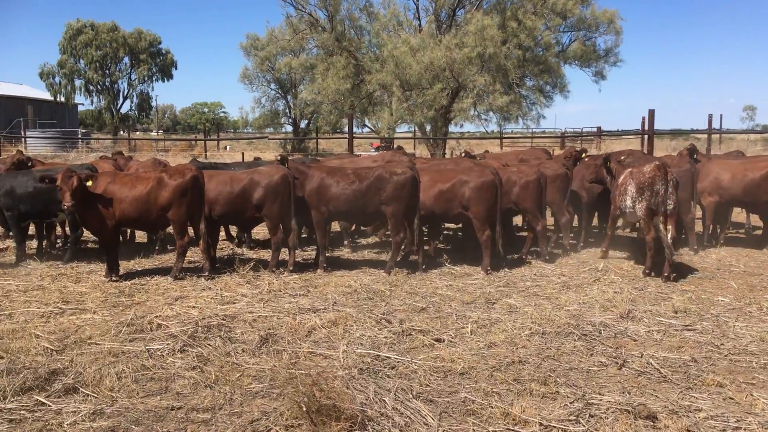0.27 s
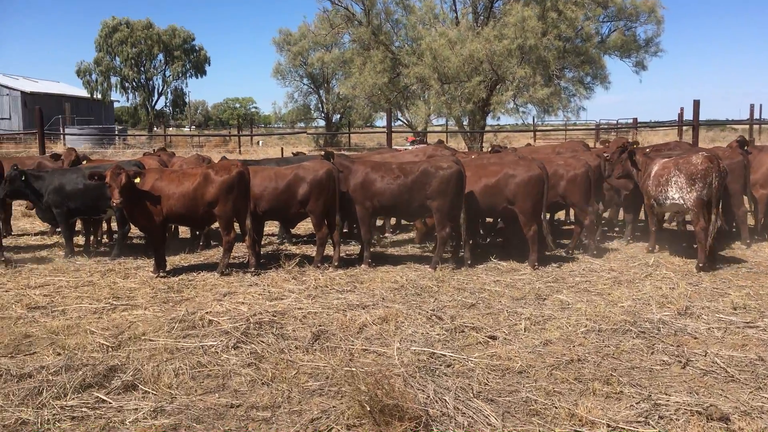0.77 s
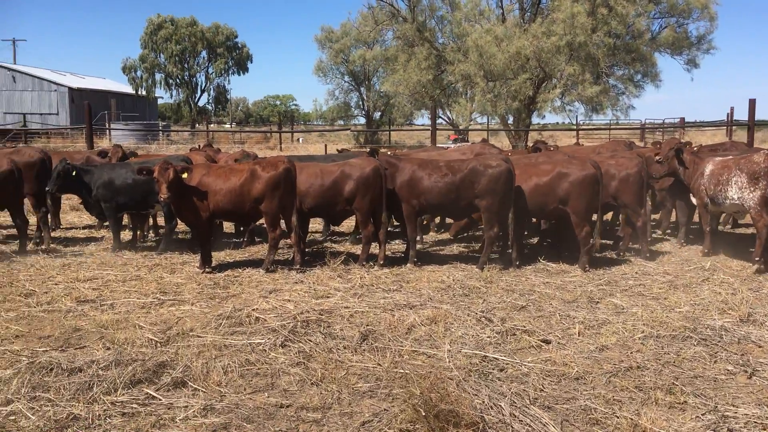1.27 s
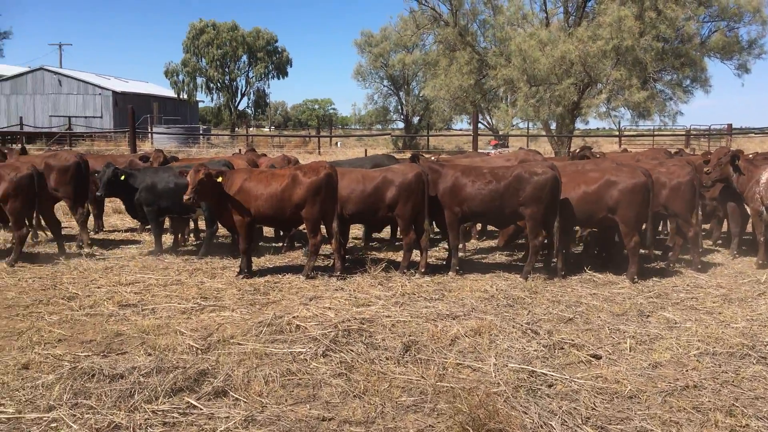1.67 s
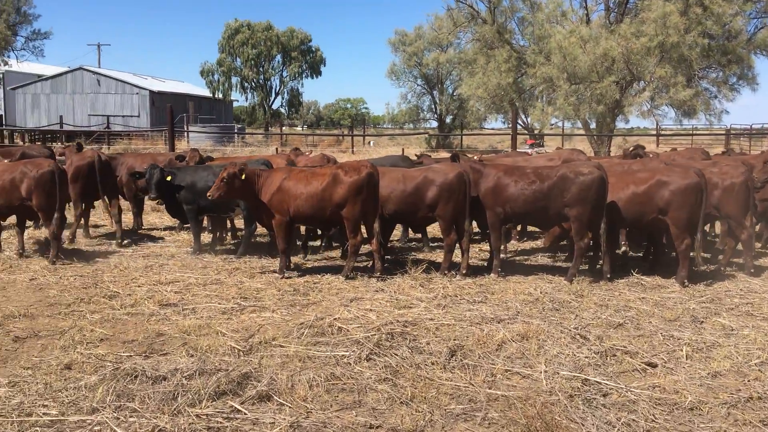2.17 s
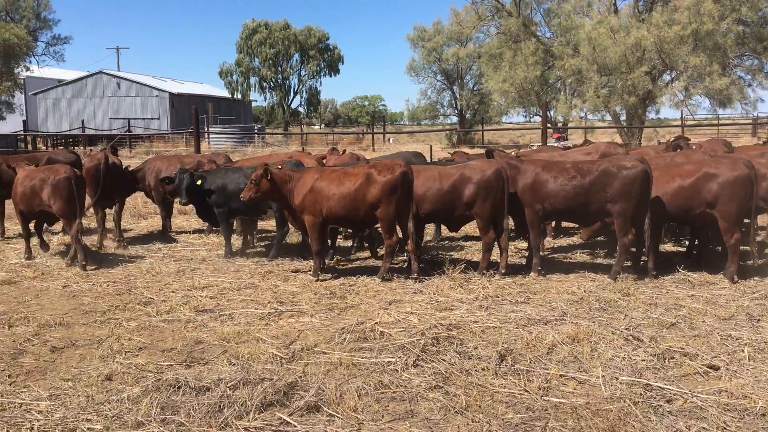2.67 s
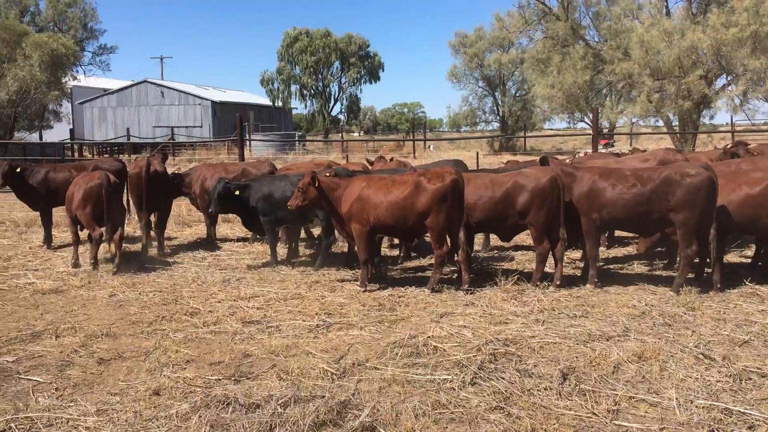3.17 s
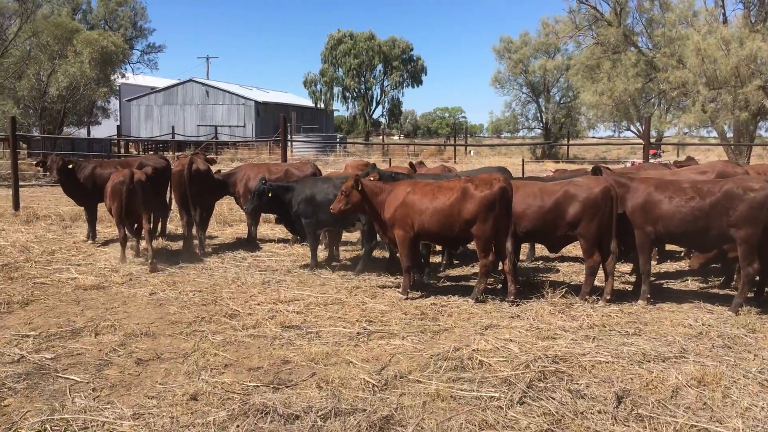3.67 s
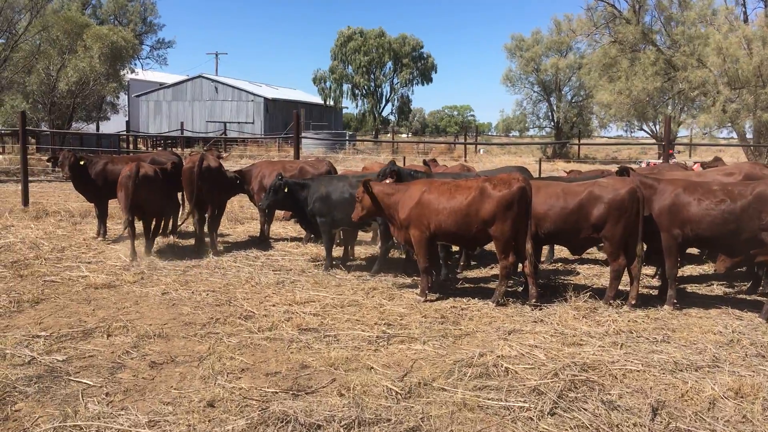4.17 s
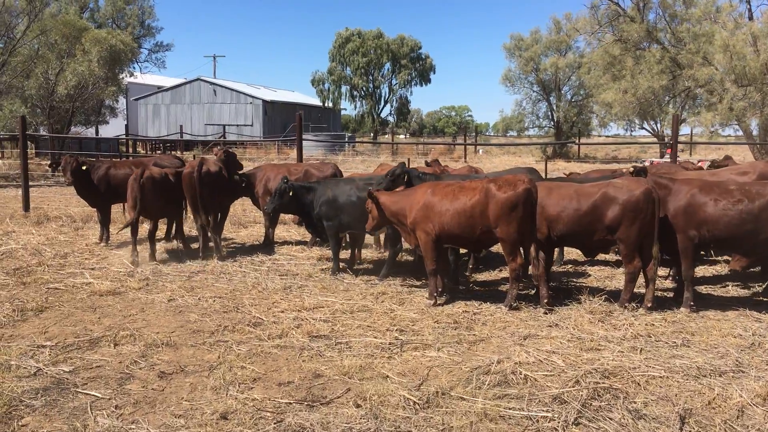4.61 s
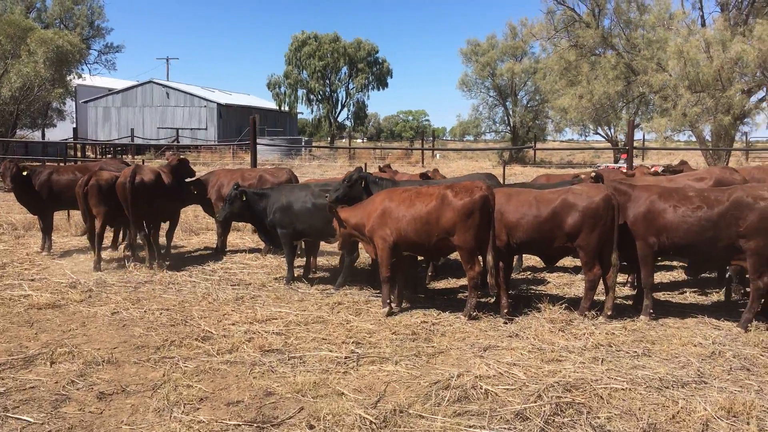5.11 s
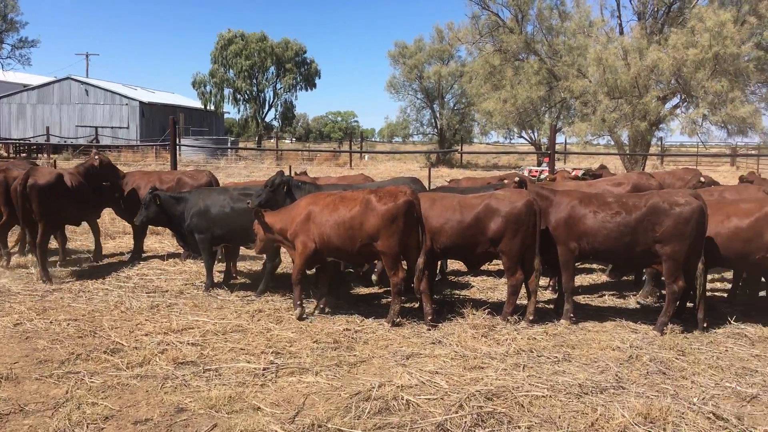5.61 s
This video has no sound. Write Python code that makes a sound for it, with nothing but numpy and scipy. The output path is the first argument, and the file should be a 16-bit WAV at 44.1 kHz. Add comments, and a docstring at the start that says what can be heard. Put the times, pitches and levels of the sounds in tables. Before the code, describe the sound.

Dry straw swishes and snaps under unhurried steps, dull earth knocks beneath, while soft outdoor hiss and low wind puffs continue.

```python
"""An open cattle yard: slow steps on dry straw and stubble, heard by one microphone.
Each step swells a swish of tiny stalk fractures and a darker crunch, both made of short rings and noise.
Single stalks snap, clods knock and the earth thuds: noise bursts through clicks tuned to each break.
Light wind rumbles on the microphone as low noise, over the steady filtered hiss of the yard."""
import sys
import numpy as np
from scipy import signal
from scipy.fft import rfft, irfft, next_fast_len
from scipy.io import wavfile
from scipy.ndimage import map_coordinates

SR = 44100
rng = np.random.default_rng(int(sys.argv[2]) if len(sys.argv) > 2 else 0)


def inscribe(sig):
    """Save sig as 16-bit PCM at rate SR to the path in sys.argv[1].

    A 1-D sig is mono; a 2-D sig holds one channel per row.
    Samples are clipped to [-1, 1] before scaling.
    """
    pcm = np.round(np.clip(np.atleast_2d(sig).T, -1, 1) * 32767)
    wavfile.write(sys.argv[1], SR, pcm.astype(np.int16))


N = 257974  # length in samples

# A foot pressing or brushing through the litter. Each row: greatest pressure in seconds, rise in seconds,
# fall in seconds, relative swish of fine straw in dB, relative crunch of coarse stubble in dB.
FOOTSTEPS = [(0.234, 0.18, 0.18, -39.5, -71), (0.426, 0.038, 0.17, -44, -66),
             (0.719, 0.056, .025, -38.5, -64), (0.837, .04, .14, -48, -72), (1.129, .13, 0.027, -42, -56.5),
             (1.229, 0.088, 0.039, -41, -79), (1.378, 0.078, .03, -45, -63), (1.54, 0.055, 0.065, -49, -60),
             (1.657, 0.0319, 0.13, -48, -61), (1.805, 0.031, 0.051, -48, -72), (2.08, 0.12, .17, -47, -56),
             (2.224, 0.17, .09, -44, -67), (2.484, 0.12, .04, -47, -56.5), (2.598, .15, 0.035, -45.5, -65),
             (2.702, 0.088, 0.032, -45, -61), (2.79, 0.042, .08, -48.5, -55.5),
             (2.86, .08, .13, -47.5, -62), (3.262, 0.14, 0.14, -41.5, -54.5),
             (3.531, 0.033, 0.044, -49, -60), (3.685, 0.019, .05, -56, -61.5), (4.073, .14, .1, -41.5, -57),
             (4.349, .1, 0.17, -52, -64), (4.543, 0.029, 0.039, -50, -56.5),
             (4.717, .04, .13, -51.5, -63.5), (4.919, .075, .045, -42, -56.5), (5.11, 0.021, .15, -53, -66),
             (5.3, .045, 0.088, -42.5, -74.5), (5.448, 0.031, 0.074, -46.5, -56.5),
             (5.835, 0.21, 0.072, -46.5, -76)]


def amp(db):
    """Decibels to gain."""
    return 10 ** (np.asarray(db) / 20)


def unit(x):
    """Scale to rms 1."""
    return x / np.sqrt(np.mean(x ** 2) + 1e-20)


def curves(rows):
    """One value per sample for each column after the time, in straight lines between rows."""
    s, *cols = np.transpose(rows)
    return [np.interp(np.arange(N) / SR, s, c) for c in cols]


def wobble(rate):
    """A smooth random curve, rate knots a second."""
    knots = rng.standard_normal(int(N * rate / SR) + 4)
    return map_coordinates(knots, [np.arange(N) * rate / SR])


def filtered(x, response):
    """x times a response of frequency."""
    m = next_fast_len(N + 8192)
    spectrum = rfft(x, m) * response(np.fft.rfftfreq(m, 1 / SR))
    return irfft(spectrum, m)[..., :N]


def coloured(x, spectrum):
    """x through (Hz, dB) points on a log axis, at rms 1."""
    f, db = np.transpose(spectrum)
    return unit(filtered(x, lambda hz: amp(np.interp(np.log(hz + 1), np.log(f), db))))


def swell(s, rise_s, fall_s, swing_db):
    """A gain that climbs evenly in dB to 1 at time s, then sinks; it moves swing_db per rise or fall time."""
    t = np.arange(N) / SR - s
    return amp(-swing_db * np.maximum(-t / rise_s, t / fall_s))


def pulse(centre_hz, octaves, steepness, size=2048):
    """A causal click of peak 1 whose energy lies in a bell around its centre; low steepness gives wide skirts."""
    away = np.log2((np.fft.rfftfreq(size, 1 / SR) + 1) / centre_hz) / octaves
    log_gain = -steepness * np.log(1 + away ** 2 / (4 * steepness))
    cepstrum = irfft(log_gain)
    # doubling the first half of the cepstrum packs the energy at the onset (minimum phase)
    click = irfft(np.exp(rfft(2 * cepstrum[:size // 2], size)))
    return click / np.abs(signal.hilbert(click)).max()


def add(track, s, sound):
    """Mix a sound into a track at a time."""
    part = track[max(round(s * SR), 0):][:len(sound)]
    part += sound[:len(part)]


def fracture(click, tear_t60, splinter_db, splinter_t60):
    """One sharp break that tears on, then a spray of splinters of the same colour; each t60 is s to fall 60 dB."""
    t = np.arange(SR // 8) / SR
    tear, spray = rng.standard_normal((2, len(t)))
    tear *= amp(-60 * t / tear_t60)
    force = .5 * tear / np.linalg.norm(tear)
    force[0] = 1  # the break itself
    crack = signal.fftconvolve(force, click)
    splinters = signal.fftconvolve(spray * amp(-60 * t / splinter_t60), click)
    # the break carries the energy of the plain click, the splinters a share of it
    crack /= np.linalg.norm(crack)
    splinters *= amp(splinter_db) / np.linalg.norm(splinters)
    return np.linalg.norm(click) * (crack + splinters)


def crackle(rate, spread_db, low_hz, high_hz, life, size=160):
    """Tiny breaks at random moments, rate a second: each rings at its own pitch and fades over life seconds."""
    start = np.flatnonzero(rng.random(N) < rate / SR)
    pitch, chance, phase = rng.random((len(start), 3)).T[:, :, None]
    t = np.arange(size) / SR
    strength = amp(-spread_db * np.log(chance + .015))  # a positive spread leaves a few breaks much stronger
    hz = low_hz + pitch * (high_hz - low_hz)
    rings = strength * np.exp(-t / life) * np.sin(2 * np.pi * (hz * t + phase))
    samples = start[:, None] + np.arange(size)
    return unit(np.bincount(samples.ravel(), rings.ravel(), N + size)[:N])


def slips(rate, life, depth_db):
    """A gain that jumps whenever a bunch of stalks gives way, rate a second, and sinks again over life seconds."""
    jumps = (rng.random(N) < rate / SR) * rng.random(N)
    surge = signal.lfilter([1], [1, -np.exp(-1 / (life * SR))], jumps)
    return unit(amp(depth_db * unit(surge - surge.mean())))


def wind():
    """Relative strength of the wind as a gain: short puffs that come and go over a wandering breeze."""
    # The light air between puffs. Each row: time in seconds, relative level in dB.
    breeze = [(0, -67.5), (2.5, -63), (3.0, -72), (3.7, -66), (4.5, -64), (5.5, -69), (5.85, -63)]
    # Puffs on the microphone. Each row: peak in seconds, relative level in dB, time to rise or sink in seconds.
    puffs = [(0.141, -55.5, 0.22), (0.602, -53.5, 0.17), (0.746, -45, 0.024), (0.97, -52, .07),
             (1.12, -54, 0.037), (1.393, -57, 0.11), (1.689, -56, 0.077), (1.823, -50, 0.056),
             (2.571, -51, .06), (2.66, -52.5, 0.091), (3.22, -54, 0.062), (4.129, -54, 0.059),
             (4.364, -55, 0.19), (5.147, -52.5, 0.071)]
    swing_db, eddies_per_s = 3, 12
    power = amp(curves(breeze)[0] + swing_db * wobble(eddies_per_s)) ** 2
    for s, db, length_s in puffs:
        power += (amp(db) * swell(s, length_s, length_s, swing_db=18.5)) ** 2
    return np.sqrt(power)


def air():
    """The steady hush of the open yard, and low eddies on the microphone: two noises of different colour."""
    # Level of the hush. Each row: time in seconds, level in dB.
    hush_level = [(0, -59), (2.3, -57), (3.0, -59), (4.2, -57.5), (5.85, -59.5)]
    # Colour of the hush. Each row: frequency in Hz, relative density in dB.
    yard_colour = [(30, -47), (70, -2), (160, -2), (260, -6.5), (450, -15.5), (750, -16), (1100, -15),
                   (2000, -18.5), (5000, -21.5), (15000, -15)]
    # Colour of wind on the microphone. Each row: frequency in Hz, relative density in dB.
    buffet_colour = [(15, -15.5), (28, -10), (48, -2), (70, -3.5), (120, -15), (250, -27), (700, -58)]
    hush_gain = amp(curves(hush_level)[0] + 1.47 * wobble(14))
    hush = hush_gain * coloured(rng.standard_normal(N), yard_colour)
    eddies = amp(-2) * wind() * coloured(rng.standard_normal(N), buffet_colour)
    return hush + eddies


def tread():
    """Swish and crunch in dB: every step loads the litter and lets it go, on top of its steady stirring."""
    # Litter that keeps stirring between steps. Each row: time in seconds, relative swish in dB,
    # relative crunch in dB.
    stirring = [(0, -53.5, -56.5), (1.55, -50, -65), (1.92, -53.5, -73.5), (2.3, -51, -62),
                (3.0, -55.5, -69), (3.7, -56, -69), (4.65, -60, -71), (5.85, -59, -66.5)]
    swing_db = 10  # gained over the rise, lost over the fall
    uneven_db, uneven_per_s = 0.35, 25  # the litter is never evenly thick
    power = amp(curves(stirring)) ** 2
    for s, rise_s, fall_s, swish_db, crunch_db in FOOTSTEPS:
        press = amp([[swish_db], [crunch_db]]) * swell(s, rise_s, fall_s, swing_db)
        power += press ** 2
    return 10 * np.log10(power) + uneven_db * wobble(uneven_per_s)


def straw(swish_db):
    """Fine stalks rub and crack; harder pressure breaks more of them a second."""
    # Colour of fine straw. Each row: frequency in Hz, relative density in dB.
    straw_colour = [(500, -29), (2000, -25.5), (3000, -19.5), (5000, -14), (6000, -6), (8000, -6.5),
                    (8700, -1.5), (9600, -0.3), (10400, -4.5), (11400, 0.5), (14000, 1), (15800, -3)]
    pressure = amp(swish_db - swish_db.max())
    cracks = crackle(rate=1500 + 9000 * pressure, spread_db=2.5, low_hz=2004, high_hz=16300, life=0.0002)
    rubbing = rng.standard_normal(N)
    level = amp(swish_db + 1.5) * slips(rate=130, life=0.009, depth_db=1.1)
    return level * coloured(cracks + rubbing, straw_colour)


def stubble(crunch_db):
    """Coarse stems and dry dirt crumble in darker, sparser grains of nearly even strength, amid dusty noise."""
    # Colour of coarse stubble. Each row: frequency in Hz, relative density in dB.
    stubble_colour = [(120, -3), (300, -1.5), (600, -4.5), (1050, -4), (1900, -4), (3300, 1.5),
                      (5000, -0.5), (7000, 8), (15000, -16)]
    grains = crackle(rate=1100, spread_db=-0.5, low_hz=197, high_hz=6720, life=0.00055)
    dust = amp(3.5) * rng.standard_normal(N)
    level = amp(crunch_db + 4.5) * slips(rate=120, life=0.0076, depth_db=1.77)
    return level * coloured(grains + dust, stubble_colour)


def crumbs(crunch_db, count=70):
    """Small lumps of dry earth are crushed between the larger clods, louder where the stubble crunches."""
    track = np.zeros(N)
    for moment, size, pitch in rng.random((count, 3)):
        at = int(moment * N)
        db = -57.5 + 6 * size + 0.4 * (crunch_db[at] - crunch_db.mean())
        click = pulse(500 * 2 ** pitch, octaves=0.45, steepness=26)
        crumb = fracture(click, tear_t60=0.012, splinter_db=-5.5, splinter_t60=0.12)
        add(track, at / SR, amp(db) * crumb)
    return track


def thuds():
    """Weight lands on the earth: a low push, and the litter settles after it."""
    # Soft footfalls on packed earth. Each row: start in seconds, relative level in dB, centre in Hz.
    footfalls = [(0.077, -43, 240), (0.444, -49.5, 203), (1.344, -50, 148), (1.698, -51, 131.1),
                 (2.1, -50, 170), (2.205, -49, 164.4), (2.303, -52, 270.5), (2.346, -51, 230),
                 (2.417, -44.5, 180.8), (2.481, -47, 200.4), (3.205, -49.5, 182.4), (3.398, -47.5, 283.5),
                 (3.492, -47, 286), (4.115, -51, 131), (4.886, -54, 110.5), (5.106, -49.5, 161.3),
                 (5.201, -48.5, 253), (5.272, -48, 116), (5.374, -48.5, 136.4), (5.588, -49, 148),
                 (5.789, -54, 119)]
    track = np.zeros(N)
    for s, db, hz in footfalls:
        click = pulse(hz, octaves=0.43, steepness=7.4)
        thud = fracture(click, tear_t60=0.0098, splinter_db=-2.5, splinter_t60=0.15)
        add(track, s, amp(db - 1.5) * thud)
    return track


def knocks():
    """Clods give way with a dull knock of a few cycles and crumble; the lower the knock, the longer it tears."""
    # Clods and thick stems giving way. Each row: start in seconds, relative level in dB, centre in Hz,
    # width in octaves.
    clods = [(0.081, -45, 415, 1.4), (0.3955, -41, 860, 0.66), (0.431, -38, 700, 1.8),
             (0.447, -39, 450, 1.23), (0.447, -28, 3420, 0.83), (0.5645, -27, 2300, 1.26),
             (0.7194, -29, 2260, 0.81), (1.0624, -36.5, 1300, 0.68), (1.955, -39, 502, 1.4),
             (2.285, -33, 502, 1.7), (2.4137, -36, 1219, 0.81), (2.4185, -29, 446, 2.4),
             (2.48, -32, 1600, 1.6), (2.482, -32.5, 457, 1), (2.4957, -34, 1000, 1.2),
             (2.929, -43.5, 794, 0.65), (3.15, -44.5, 850, 0.56), (3.2187, -39, 2610, .7),
             (3.358, -43.5, 743, 0.69), (3.401, -41.5, 346, 1.24), (3.494, -42.5, 607, 1.1),
             (3.672, -39.5, 1455, 0.56), (4.184, -45, 893, .9), (4.402, -45.5, 1394, 0.59),
             (4.54, -38.5, 1389, 0.58), (4.7823, -34, 2080, 0.91), (4.807, -41, 1100, 0.69),
             (5.1538, -37.5, 835, 0.84), (5.18, -41.5, 2696, 0.27), (5.43, -45.5, 1710, 0.45)]
    tear_cycles = 15  # time to fall 60 dB, in cycles of the clod's own pitch
    track = np.zeros(N)
    for s, db, hz, octaves in clods:
        click = pulse(hz, octaves, steepness=16)
        knock = fracture(click, tear_t60=tear_cycles / hz, splinter_db=-3.5, splinter_t60=0.093)
        add(track, s, amp(db + 1) * knock)
    return track


def twigs(swish_db, count=6):
    """Every step breaks a few small stalks around it, each with its own colour, louder under a heavy foot."""
    scatter_s = .13  # at most this long before or after a step's greatest pressure
    track = np.zeros(N)
    for step_s, *_ in FOOTSTEPS:
        for moment, size, pitch in rng.random((count, 3)):
            s = np.clip(step_s + scatter_s * (2 * moment - 1), 0, (N - 1) / SR)
            db = -38 + 9 * size + 0.083 * (swish_db[int(s * SR)] - swish_db.mean())
            click = pulse(6000 * 2 ** pitch, octaves=0.44, steepness=4.1)
            twig = fracture(click, tear_t60=0.003, splinter_db=-11, splinter_t60=0.06)
            add(track, s, amp(db) * twig)
    return track


def snaps():
    """Brittle stalks break with a bright tick and a short spray."""
    # Single stalks breaking. Each row: start in seconds, relative level in dB, centre in Hz, width in octaves.
    stalks = [(0.14, -24, 10200, 0.65), (0.2283, -11, 10900, 0.7), (0.2304, -14.5, 9000, .55),
              (0.4216, -21.5, 9000, 0.32), (0.565, -32, 6100, 0.44), (0.651, -25, 11300, .23),
              (0.7046, -19, 12400, 0.22), (0.717, -22, 12000, .37), (0.7194, -9, 10490, 0.29),
              (0.7761, -30, 12100, 0.36), (0.954, -19, 12200, 0.33), (1.0621, -10.5, 13000, 0.46),
              (1.6657, -24.5, 10700, 0.36), (2.4142, -21.5, 7800, 0.43), (2.481, -25.5, 8500, 0.31),
              (2.8908, -24.5, 11340, 0.24), (3.5297, -22, 10340, 0.3), (3.72, -27.5, 8450, 0.72),
              (4.0176, -16.5, 9680, 0.3), (4.0763, -28, 13140, 0.51), (4.1836, -30, 10150, 0.51),
              (4.3965, -24.5, 10300, 0.33), (4.414, -22, 9700, 0.49), (4.4437, -33, 8100, .54),
              (4.46, -27.5, 8420, 0.48), (4.54, -17, 6000, 0.58), (4.7457, -29, 8330, 0.39),
              (4.7823, -30.5, 6520, 0.31), (4.842, -26, 10520, .61), (4.9436, -28, 7810, 0.68),
              (4.997, -29, 9300, 0.7), (5.0907, -29, 7680, 0.43), (5.108, -24, 12150, 0.67),
              (5.2396, -28, 10370, 0.37), (5.2817, -21, 12120, .26), (5.2935, -26, 12770, 0.24),
              (5.3816, -27.5, 11450, 0.32), (5.461, -22, 10230, 0.66), (5.485, -22.5, 10260, 0.86),
              (5.5257, -22, 11900, 0.46)]
    track = np.zeros(N)
    for s, db, hz, octaves in stalks:
        click = pulse(hz, octaves, steepness=3.4)
        snap = fracture(click, tear_t60=0.00087, splinter_db=-7, splinter_t60=0.024)
        add(track, s, amp(db + 3.5) * snap)
    return track


def scene():
    """Everything meets at one microphone and feeds both channels."""
    swish_db, crunch_db = tread()
    litter = straw(swish_db) + stubble(crunch_db) + twigs(swish_db) + crumbs(crunch_db)
    mono = litter + snaps() + knocks() + thuds() + air()
    return np.array([mono, mono])


def record(dry):
    """The recorder keeps almost nothing above its band limit: a very steep low-pass."""
    top_hz = 15980
    return filtered(dry, lambda hz: 1 / (1 + (hz / top_hz) ** 400))


dry = scene()
out = record(dry)
inscribe(out)
```